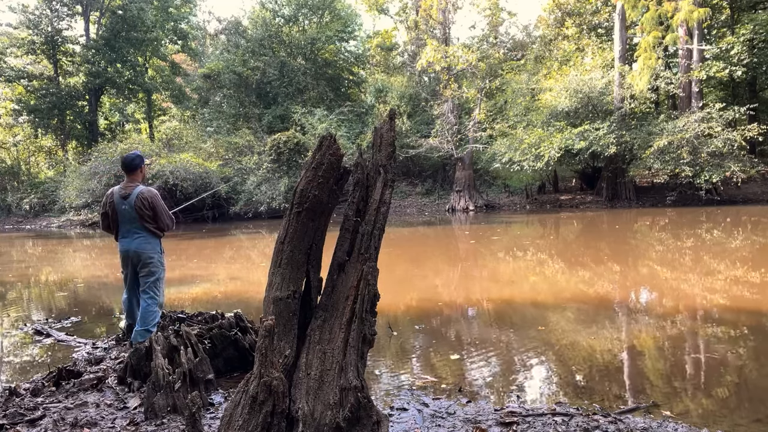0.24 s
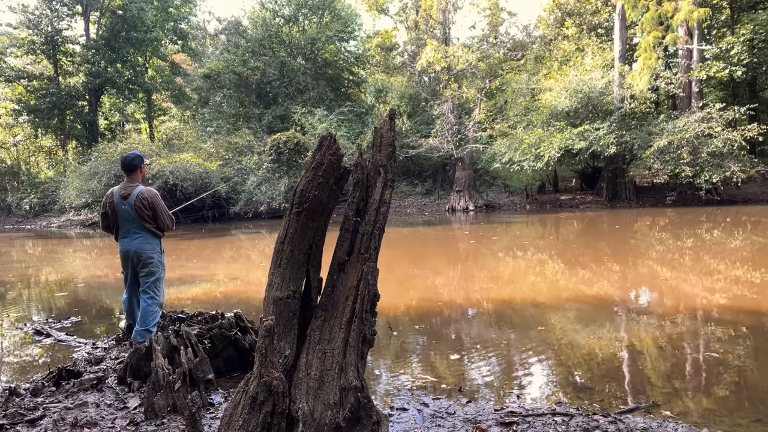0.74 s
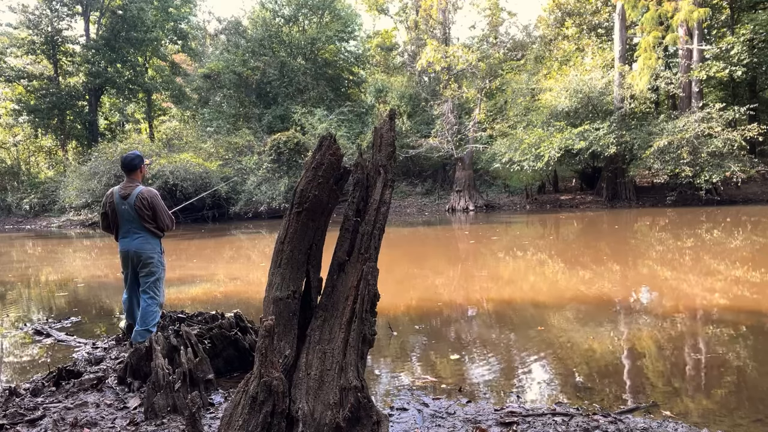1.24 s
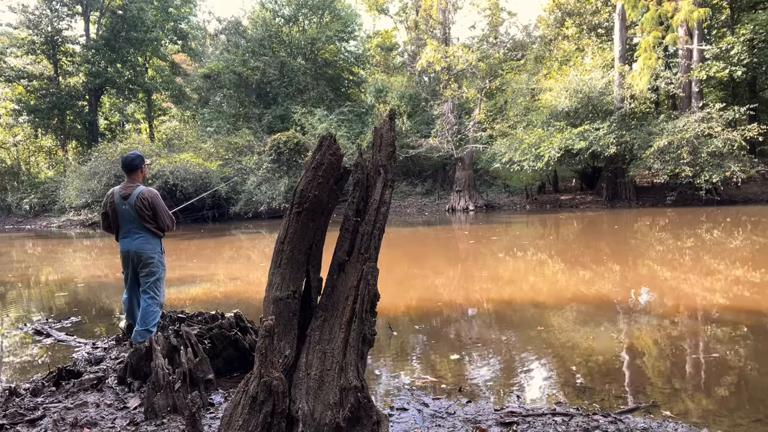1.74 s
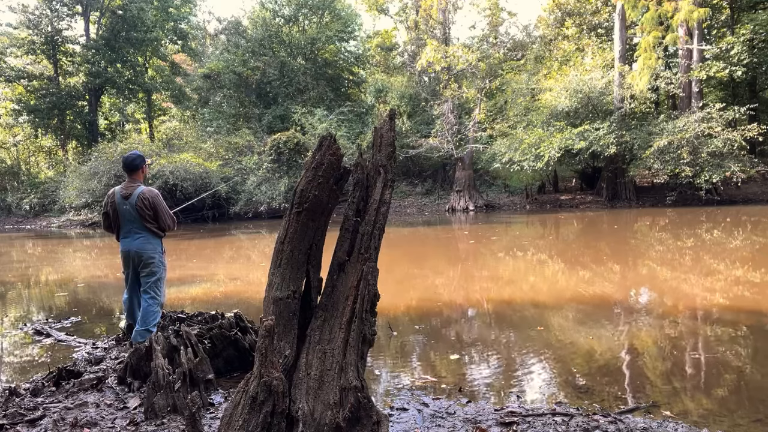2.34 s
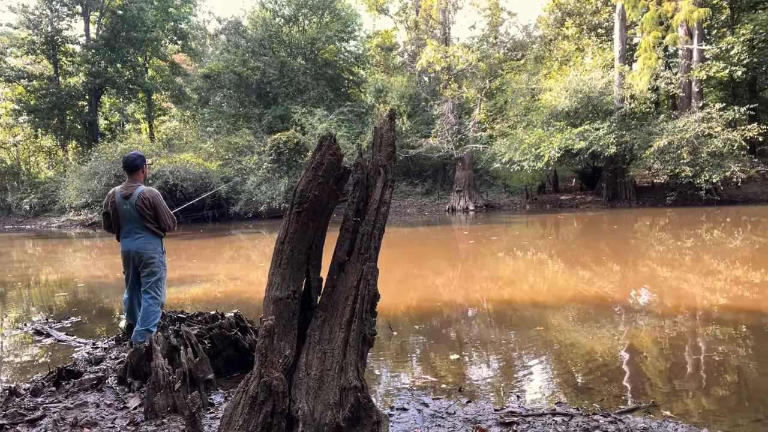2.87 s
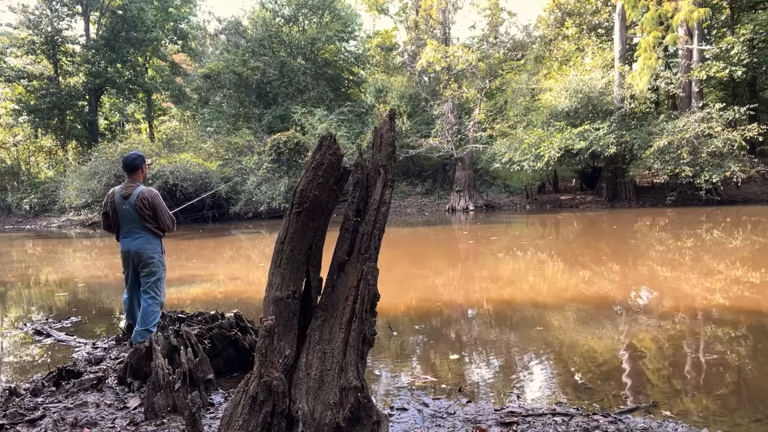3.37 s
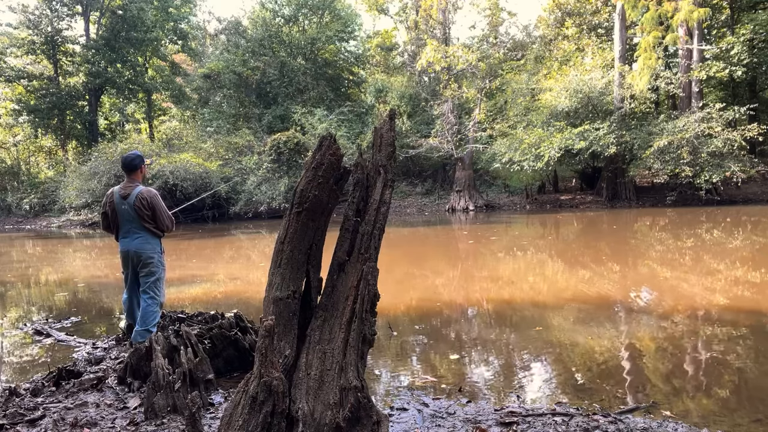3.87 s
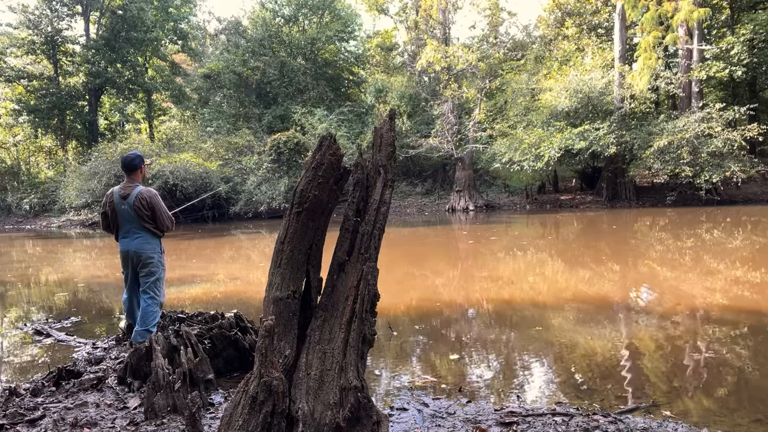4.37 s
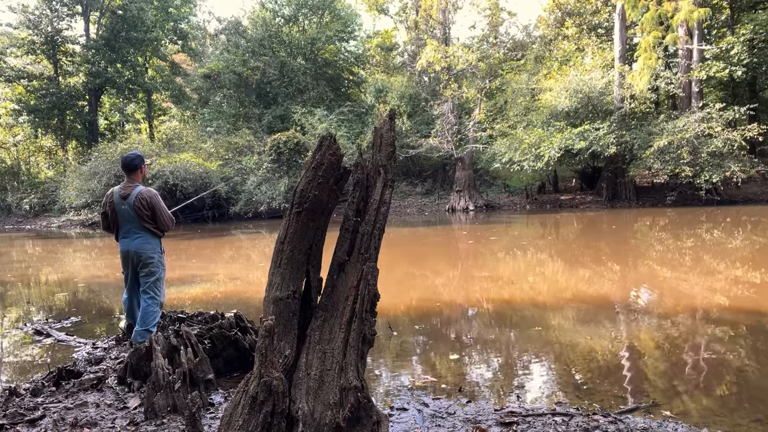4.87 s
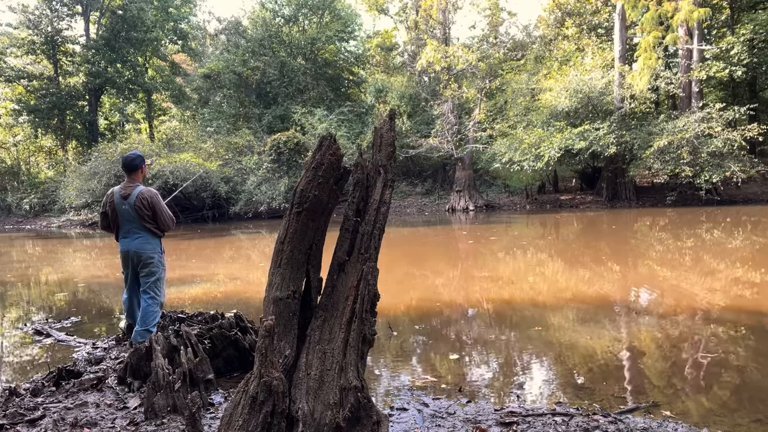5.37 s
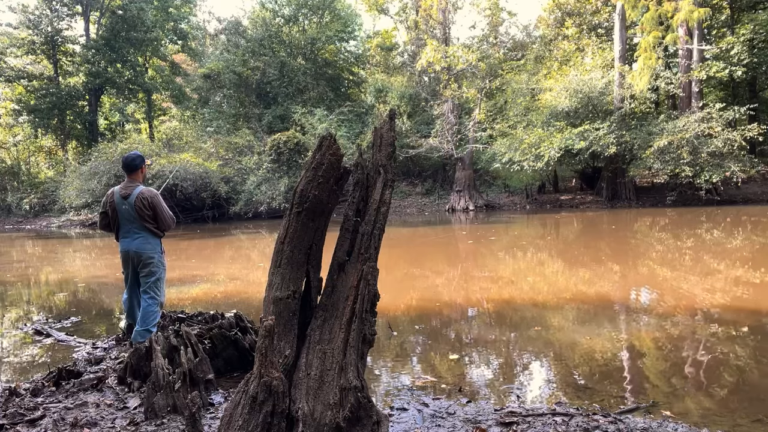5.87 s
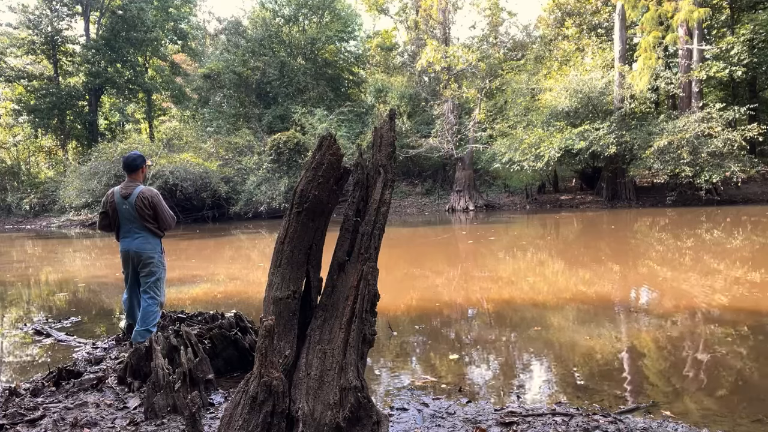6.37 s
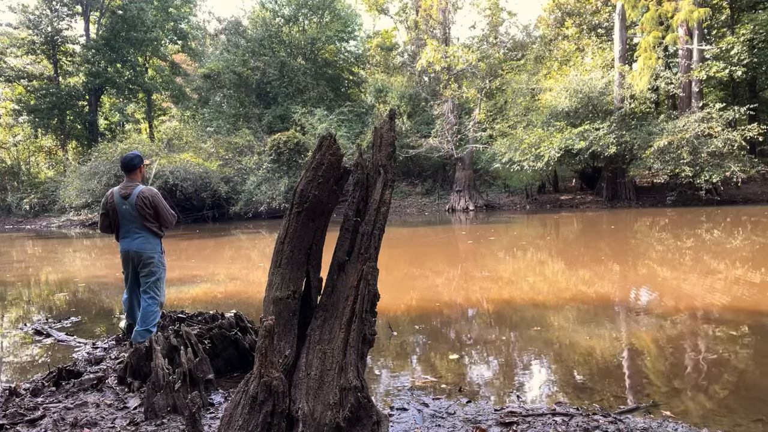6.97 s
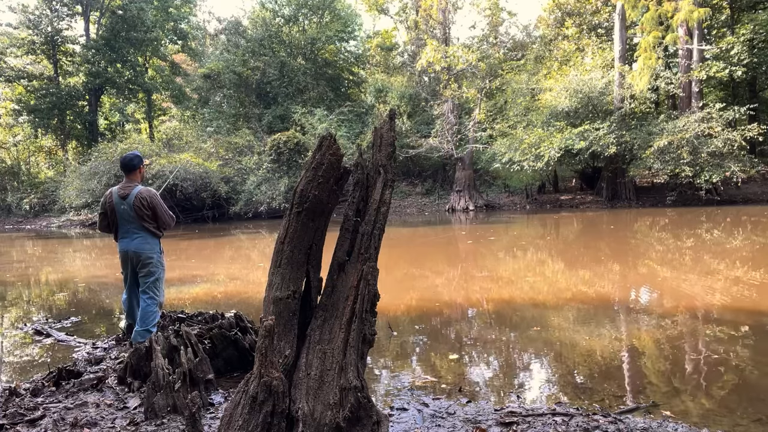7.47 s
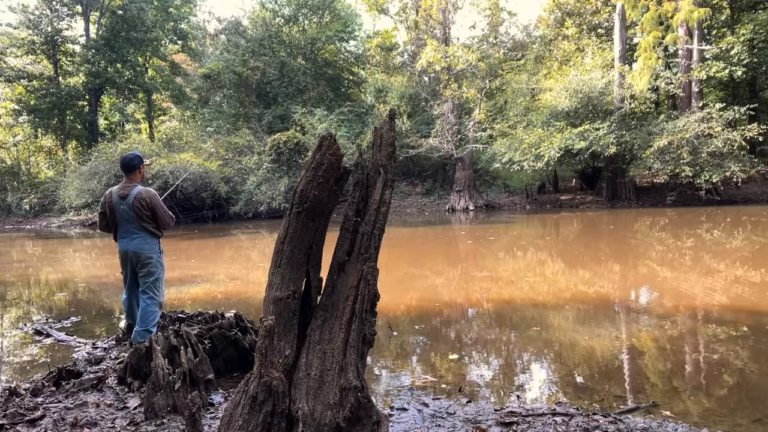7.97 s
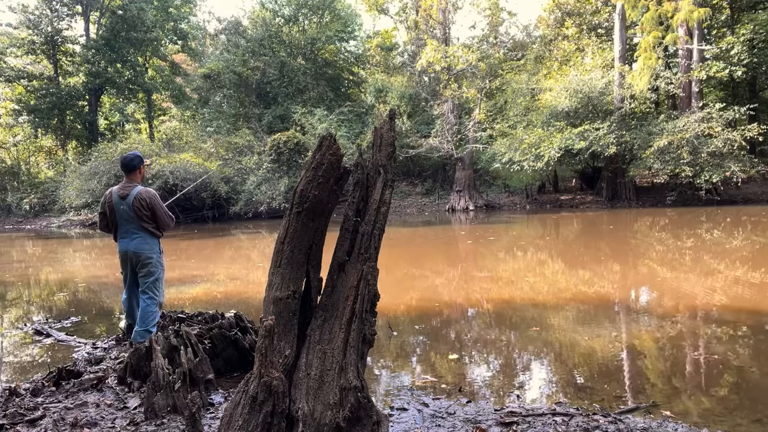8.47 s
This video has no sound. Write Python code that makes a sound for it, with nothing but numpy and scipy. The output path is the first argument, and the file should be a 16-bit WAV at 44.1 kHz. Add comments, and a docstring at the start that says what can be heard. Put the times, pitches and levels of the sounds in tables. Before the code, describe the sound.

A dense, steady high cicada drone fills a swamp while a close katydid ticks and buzzes and a bird repeats a short falling roll.

```python
"""A far chorus of cicadas drones at once, while a katydid close by ticks and buzzes in turn: a still, hot swamp.
The drone is noise in a tymbal resonance; the katydid is rasp noise and ringing modes gated stroke by stroke.
A wren repeats a falling roll of slurred whistles, scattered by the trees. Dry clicks and a brief rustle are
filtered noise; wind noise thumps and flutters on the microphones, a low sine hum comes and goes.
A thin insect sizzle and a steady outdoor hiss lie behind. Two close microphones differ in phase and level."""
import sys
import numpy as np
from scipy import signal
from scipy.fft import rfft, irfft, next_fast_len
from scipy.io import wavfile
from scipy.ndimage import uniform_filter1d, map_coordinates

SR = 44100
rng = np.random.default_rng(int(sys.argv[2]) if len(sys.argv) > 2 else 0)


def persist_wave(psi):
    """Save psi, clipped to +-1, as 16-bit WAV."""
    counts = np.round(np.clip(psi, -1, 1) * 32767).astype(np.int16)
    wavfile.write(sys.argv[1], SR, np.atleast_2d(counts).T)


N = 383890
T = np.arange(N) / SR  # time [s]

# left-right correlation of the insects before the microphones: (frequency [Hz], correlation [-1 to 1])
INSECT_CORRELATION = [(6300, 0.43), (7000, 0.75), (8000, 0.91), (9000, 1), (9600, 1), (12300, 1),
                      (12500, 0.43), (15500, 0.92)]


def amp(db):
    """Level in decibels to amplitude ratio."""
    return 10 ** (np.asarray(db) / 20)


def unit(x):
    """Normalization to an rms of 1."""
    return x / np.sqrt(np.mean(x ** 2) + 1e-20)


def along(points, hz):
    """Linear interpolation of (frequency [Hz], value) points on a logarithmic frequency axis."""
    f, v = np.transpose(points)
    return np.interp(np.log(hz + 1), np.log(f + 1), v)


def curves(rows):
    """Linear interpolation in time: one value per sample for each column after the time."""
    seconds, *columns = np.transpose(rows)
    return [np.interp(T, seconds, column) for column in columns]


def wobble(rate):
    """Slow random modulation: a smooth spline through random knots, rate of them a second."""
    knots = rng.standard_normal(int(N * rate / SR) + 4)
    return map_coordinates(knots, [T * rate])


def filtered(x, response):
    """Linear filtering: the spectrum of x times a complex response of frequency."""
    m = next_fast_len(N + SR // 2)
    return irfft(rfft(x, m) * response(np.fft.rfftfreq(m, 1 / SR)), m)[..., :N]


def rush(spectrum, correlation, patchy_db=0):
    """Partly coherent stereo noise of rms 1: a mid-side mix sets the correlation, random gains the patches."""
    z = signal.stft(rng.standard_normal((2, N)), nperseg=512)[2]
    patches = rng.standard_normal(z.shape[1:])
    for axis in (0, 1):
        patches = uniform_filter1d(patches, size=6, axis=axis)
    pair = signal.istft(z * amp(patchy_db * unit(patches)), nperseg=512)[1][:, :N]

    def response(hz):
        # mid power minus side power is the cosine of twice this angle
        angle = np.arccos(np.clip(along(correlation, hz), -1, 1)) / 2
        return amp(along(spectrum, hz)) * [np.cos(angle), np.sin(angle)]

    mid, side = filtered(pair, response)
    return unit(np.array([mid + side, mid - side]))


def trees(x, t60, shared_power):
    """Diffuse scattering by trunks and water: exponentially decaying noise, partly shared by both microphones."""
    t = np.arange(SR // 2) / SR
    envelope = amp(-60 * t / t60) * (1 - np.exp(-t / 0.0089))
    shared, left, right = rng.standard_normal((3, len(t))) * envelope
    share = np.clip(shared_power, 0, 1)
    tail = np.sqrt(share) * shared + np.sqrt(1 - share) * np.array([left, right])
    return signal.oaconvolve(x[None], tail / np.linalg.norm(shared), axes=1)[:, :N]


def cicadas():
    """Incoherent superposition: so many tymbals click at once that they melt into noise in the body resonance."""
    # resonance of tymbal and body: (frequency [Hz], relative level [dB])
    tymbal = [(5000, -120), (6100, -43.5), (6400, -31), (6800, -11), (7200, -3), (7500, 0), (7900, 1.54),
              (8100, -6), (8500, -15), (9000, -22.5), (9600, -42.5), (10300, -29.5), (12000, -52)]
    chorus_db = -39
    return amp(chorus_db) * rush(tymbal, INSECT_CORRELATION, patchy_db=0.81)


def katydid():
    """Stridulation: each wing stroke drags a file over a scraper, a short rasp that also rings the membrane."""
    # buzzes: (start [s], start of fade [s], level [dB], swell [s], softening at the start [dB])
    buzzes = [(0.5, 3.72, -55, .9, 10), (4.868, 7.33, -54.5, 0.26, 4.5)]
    # single strokes before and after the buzzes: (time [s], gate level [dB])
    ticks = [(0.0355, -50.5), (0.1145, -50.5), (0.1974, -53.5), (0.2768, -52.5), (0.3551, -53),
             (0.4386, -54.5), (4.375, -54.5), (4.4516, -50.5), (4.5157, -51), (4.5845, -50), (4.655, -51.5),
             (4.7176, -51.5), (8.2147, -54.5), (8.309, -53.5), (8.3804, -51.5), (8.4412, -48.5),
             (8.513, -53.5), (8.5839, -51.5), (8.6547, -50)]
    # wing beat of each buzz: (moment of one stroke [s], stroke rate there [1/s], slowing [1/s per s])
    wing_beat = [(2.2094, 42.55, 0), (6.1038, 42.3, .3)]
    # rasp of the file: (frequency [Hz], relative level [dB])
    wing_colour = [(7000, -120), (9000, -29), (9800, -14), (10300, -12.5), (11400, -3.5), (12200, -13),
                   (13000, -10), (13600, -4.5), (14200, -10.5), (14600, -2.5), (15100, -0.5), (15600, -10),
                   (16000, -15)]
    # membrane modes: (mean frequency [Hz], level before the random spread [dB])
    wing_modes = [(11400, -6.5), (13100, -8.5), (15100, -3)]
    buzz_fade_s = .06

    # strokes so far, numbered apart for each buzz
    (first, *_), (second, *_) = wing_beat
    early, late = [rate * (T - s) - slowing * (T - s) ** 2 / 2 for s, rate, slowing in wing_beat]
    count = np.where(T < (first + second) / 2, early, late + 200)
    stroke = np.round(count).astype(int)
    # sounds for about half of each stroke
    closing = np.clip(np.cos(2 * np.pi * count) + .15, 0, .8) / .8

    effort = 0
    for start, end, db, swell, soft_db in buzzes:
        swelling = amp(db - soft_db * np.clip(1 - (T - start) / swell, 0, 1))
        fading = np.clip(1 + (end - T) / buzz_fade_s, 0, 1) ** 2
        effort = effort + swelling * (T > start) * fading
    gate = effort * closing * amp(1.1 * rng.standard_normal(400)[stroke])
    for s, db in ticks:
        rise, fall = (T - s + 0.0018) / .005, (s + 0.012 - T) / .005
        gate = gate + amp(db) * np.clip(np.minimum(rise, fall), 0, 1)

    # the membrane rings a little differently on every stroke
    ring = 0
    for hz, db in wing_modes:
        detune, strength = rng.standard_normal((2, 400))[:, stroke]
        pitch = hz * (1 + 0.016 * detune + 0.01 * wobble(250))
        ring = ring + amp(db + 4 * strength) * np.sin(2 * np.pi * np.cumsum(pitch) / SR)
    rasp = rush(wing_colour, INSECT_CORRELATION, patchy_db=1.5) + amp(-4) * ring

    # leaves nearby scatter every stroke into a short fading rasp: its energy decays with a t60 of 0.3 s
    decay = amp(-60 * np.arange(SR // 4) / SR / .3) ** 2
    energy = signal.fftconvolve(gate ** 2, decay / np.sum(decay))[:N]
    scatter = np.sqrt(np.abs(energy))
    return gate * rasp + amp(-1.5) * scatter * rush(wing_colour, INSECT_CORRELATION, patchy_db=1.5)


def wren():
    """Frequency modulation: a roll of rising slurs that slows, widens and sinks, heard through the trees."""
    # calls: (first note [s], time scale of the roll [ratio], length [s], middle of the sinking after the
    # first note [s], half-width of the sinking [s], low pitch [Hz], level [dB], growth over the call [dB])
    calls = [(0.093, .98, 0.32, 0.13, 0.088, 2705, -55.5, 0),
             (1.218, 0.87, .35, 0.13, 0.058, 2790, -55.5, -1),
             (2.269, .98, 0.28, .135, .065, 2770, -56.5, 1), (3.741, .98, 0.26, 0.121, 0.081, 2795, -55, 3),
             (4.634, 0.94, 0.31, .13, .09, 2766, -52.5, 2), (5.833, 1, .335, 0.11, 0.06, 2795, -55, 0.5),
             (6.821, .98, 0.25, 0.106, 0.059, 2815, -54.5, 6),
             (8.063, 0.95, 0.3, 0.13, 0.07, 2710, -54.5, -0.5)]
    high_hz = 3410  # the roll sinks from here, fastest in the middle
    edge_db, attack_s, release_s = 9.5, 0.039, .05  # softer at both ends

    k = np.arange(14)  # notes in a full roll
    gaps = np.minimum(.017 * 1.09 ** k, .031)  # s, before the time scale
    lengths = np.minimum(.008 + .002 * k, .026)  # s
    rises = np.minimum(280 + 52.4 * k, 686)  # Hz
    heard = 0
    for start, pace, span, middle, sink, low_hz, level_db, growth_db in calls:
        voice = np.zeros(N + SR)
        onsets = pace * (np.cumsum(gaps) - gaps)
        for after, length, rise_hz in zip(onsets, lengths, rises):
            u = np.linspace(0, 1, int(length * SR))
            pitch = low_hz + (high_hz - low_hz) * (1 - np.tanh((after - middle) / sink)) / 2
            hz = pitch * (1 + rng.normal(0, .008)) + rise_hz * (u ** .8 - .6)
            note = np.sin(np.pi * u) * np.sin(2 * np.pi * np.cumsum(hz) / SR)
            edge = max(0, 1 - after / attack_s, 1 - (span - after) / release_s)
            db = level_db + growth_db * (after / span - .5) - edge_db * edge + rng.normal(0, 1.6)
            begin = int((start + after - length / 2) * SR)
            voice[begin:][:len(u)] += (after < span) * amp(db) * note
        # the bird turns between calls, so each gets echoes of its own
        heard = heard + voice[:N] + amp(-1.5) * trees(voice[:N], t60=.28, shared_power=.7)
    return amp([[-1.5], [1.5]]) * heard


def clicks():
    """Impulsive excitation of a narrow resonance: small dry bursts of noise nearby, with scattered echoes."""
    # clicks: (time [s], level [dB], ring [Hz], left-right [dB], t60 of the burst [s],
    # half-width of the band [share of the ring])
    bursts = [(0.7294, -56, 6180, -1, 0.045, 0.13), (1.1777, -55, 4630, 8, 0.045, 0.23),
              (2.2089, -59, 3080, 11, 0.05, 0.14), (2.2423, -55, 4660, 7, 0.045, 0.14),
              (3.0949, -62, 6200, 1, 0.045, 0.11), (4.236, -47, 3200, -10, 0.016, 0.072),
              (4.4383, -45, 4750, -9, 0.013, 0.093), (6.4892, -50, 5400, -5.0, 0.045, 0.13),
              (6.5575, -54, 6160, -8, 0.049, 0.17), (6.806, -43, 5900, -8, 0.025, 0.16)]
    out, t = np.zeros((2, N + SR)), np.arange(SR // 10) / SR
    for s, db, hz, pan_db, t60, width in bursts:
        band = signal.butter(3, [hz * (1 - width), hz * (1 + width)], "band", fs=SR, output="sos")
        envelope = amp(-60 * t / t60) * (1 - np.exp(-t / 0.0034))
        burst = signal.sosfilt(band, rng.standard_normal(len(t)) * envelope)
        gain = amp(db - 1.5 + np.array([[pan_db], [-pan_db]]) / 2)
        out[:, int(s * SR):][:, :len(t)] += gain * burst / np.abs(burst).max()
    # the left channel feeds the echoes
    return out[:, :N] + amp(-3.5) * trees(out[0, :N], t60=0.25, shared_power=0.46)


def rustle():
    """Amplitude-modulated band noise: one soft, uneven brush in the middle treble, sagging as it goes."""
    # colour of the brush: (frequency [Hz], relative level [dB])
    brush_colour = [(500, -120), (1500, -19), (2300, -5), (3400, -9), (4200, -3.5), (5500, -5), (6500, -2),
                    (7500, -29), (9500, -120)]
    start, end, fade_s = 1.93, 2.21, 0.073  # s, fading in before the start and out after the end
    start_db, sag_db_per_s = -63, 15
    shape = np.clip(np.minimum(T - start, end - T) / fade_s + 1, 0, 1) ** 2
    level_db = start_db - sag_db_per_s * (T - start) + 1.9 * wobble(40.3)
    return shape * amp(level_db) * rush(brush_colour, [(3000, 0.22)], patchy_db=3.0)


def wind():
    """Turbulent pressure on the microphones: puffs thump in the bass and flutter higher up, swaying sideways."""
    # course of the wind: (time [s], thump level before the puffs [dB], flutter level [dB])
    gusts = [(0.0, -39, -53), (0.07, -53, -48.5), (0.26, -46, -62), (0.43, -49.5, -44.5),
             (0.85, -60, -60.5), (1.19, -48.5, -58), (1.82, -60.5, -65), (1.91, -54.5, -55.5),
             (3.71, -56, -59.5), (4.02, -45, -55), (4.34, -49.5, -57.5), (4.6, -54, -50), (4.72, -37, -47),
             (4.77, -39.5, -46), (4.82, -48.5, -46.5), (5.67, -49.5, -57.5), (5.74, -43.5, -52),
             (6.27, -54, -49.5), (6.4, -41.5, -46.5), (6.44, -56, -54), (6.71, -47.5, -61.5),
             (7.22, -63.5, -60.5), (8.29, -46.5, -65), (8.38, -67, -61), (8.58, -53, -49), (8.7, -59, -62)]
    # colours of the two layers: (frequency [Hz], relative level [dB])
    thump_colour = [(15, -41), (25, -27.5), (32, -13), (40, 2), (50, 7), (62, 7), (80, -6.5), (100, -9),
                    (140, -42.5), (250, -120)]
    flutter_colour = [(41, -33.5), (70, -1.5), (119, -3.5), (150, -9.5), (300, -39), (390, -62.5),
                      (660, -120)]
    mean_pan_db, sway_db, puff_db = 4, 2, 2  # left-right, its wandering, quick puffs
    thump_db, flutter_db = curves(gusts)
    pan_db = mean_pan_db + sway_db * wobble(4)
    thump = amp(thump_db + puff_db * wobble(4.9)) * rush(thump_colour, [(40, 0.99), (90, 0.96)], patchy_db=1.5)
    flutter = amp(flutter_db) * rush(flutter_colour, [(90, 0.82), (200, 1.0)], patchy_db=0.5)
    return amp(np.array([pan_db, -pan_db]) / 2) * (thump + flutter)


def hum():
    """Near-periodic oscillation: a low sine of slightly wavering frequency that comes and goes in level."""
    # course of the hum: (time [s], rms level before the random wavering [dB])
    hum_level = [(0.0, -53), (1.19, -54.5), (1.35, -45), (1.6, -64), (2.25, -57), (3.51, -65.5),
                 (4.04, -47.5), (4.36, -62), (4.43, -53.5), (5.04, -44.5), (5.11, -60), (5.6, -46),
                 (5.79, -58.5), (6.4, -52.5), (6.47, -72), (6.57, -54.5), (8.63, -48.5), (8.7, -53)]
    mean_hz = 73.74
    level_db, = curves(hum_level)
    phase = 2 * np.pi * np.cumsum(mean_hz + 0.47 * wobble(3.6)) / SR
    tone = np.sqrt(2) * np.sin(phase)  # rms 1
    return amp(level_db + 1.8 * wobble(5)) * tone * amp([[1.5], [-1.5]])


def far_insects():
    """Incoherent superposition in the top octave: a thin sizzle of small insects, swelling and sinking."""
    # course of the sizzle: (time [s], level [dB])
    sizzle_level = [(0, -71.5), (.6, -72.5), (3.8, -64.5), (4.35, -71), (4.8, -69.5), (7.4, -63.5),
                    (8.0, -67.5), (8.7, -71)]
    # its colour: (frequency [Hz], relative level [dB])
    sizzle_colour = [(7500, -120), (9500, -18.5), (10300, -9.5), (11800, -20), (12800, -11.5), (14000, 3.5),
                     (15000, 3.5), (15900, -7)]
    level_db, = curves(sizzle_level)
    return amp(level_db) * rush(sizzle_colour, INSECT_CORRELATION, patchy_db=2.5)


def air():
    """Stationary broadband noise: the steady outdoor hiss, strongest in the bass."""
    # colour of the hiss: (frequency [Hz], relative level [dB])
    air_colour = [(59, -23), (100, -4), (157, -8.5), (205, -14), (322, -19.5), (584, -23.5), (1500, -31),
                  (3180, -32.5), (3720, -35.5), (4500, -36), (5460, -37), (5850, -47), (6500, -33),
                  (8450, -44.5), (14300, -120)]
    # left-right correlation before the microphones: (frequency [Hz], correlation [-1 to 1])
    air_correlation = [(100, 0.53), (250, 0.11), (600, 0.33), (1000, 0.13), (5000, 0.05)]
    level_db = -57.5
    return amp(level_db) * rush(air_colour, air_correlation, patchy_db=1.75)


def scene():
    """Linear superposition of all sources."""
    animals = cicadas() + katydid() + wren()
    return animals + clicks() + rustle() + wind() + hum() + far_insects() + air()


def record(dry):
    """Interchannel phase and level differences of two close microphones, below a sharp band limit."""
    # phase by which left leads right: (frequency [Hz], lead [rad])
    phase_lead = [(40, 0), (260, 0.1), (600, -2.5), (2700, -3), (3100, -2.2), (3500, -1.2), (4900, -2.5),
                  (6200, 0), (7060, 1.9831), (8790, 2), (9600, np.pi), (12300, np.pi), (12500, 3.5),
                  (15600, 5)]
    # level of left over right: (frequency [Hz], difference [dB])
    level_tilt = [(200, 0), (500, -1.1), (1800, 0), (3000, -1.1), (5500, -.6), (6600, 2.5), (7800, 3.5),
                  (9000, .1), (9600, 0), (12300, 0)]
    top_hz = 15830

    def response(hz):
        # each microphone takes half of the difference
        half = amp(along(level_tilt, hz) / 2) * np.exp(.5j * along(phase_lead, hz))
        return np.array([half, 1 / half]) * (hz < top_hz)

    return filtered(dry, response)


dry = scene()
out = record(dry)
persist_wave(out)
```